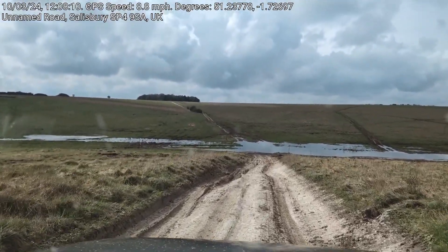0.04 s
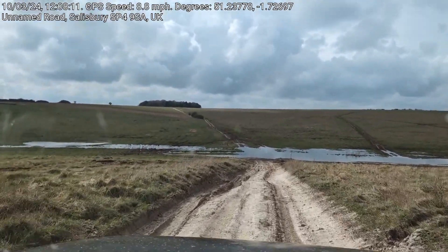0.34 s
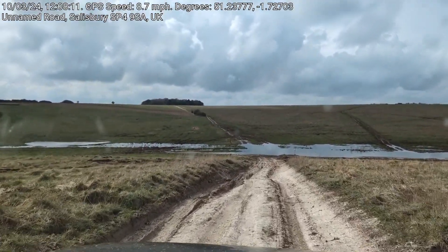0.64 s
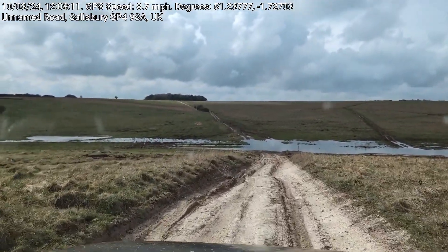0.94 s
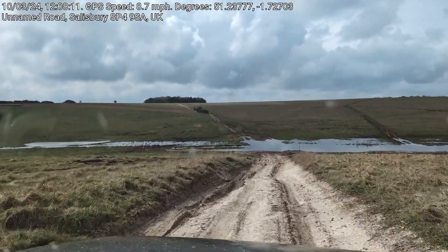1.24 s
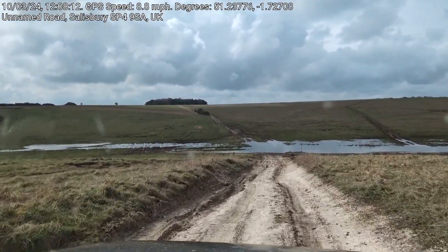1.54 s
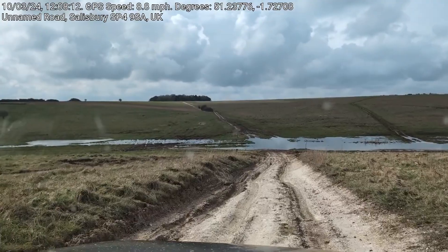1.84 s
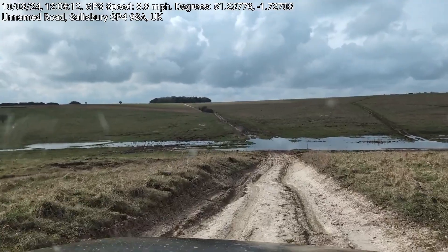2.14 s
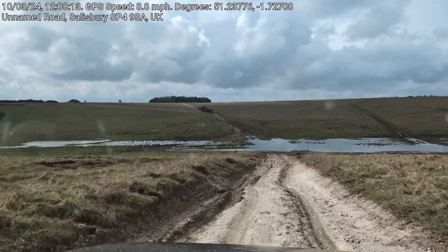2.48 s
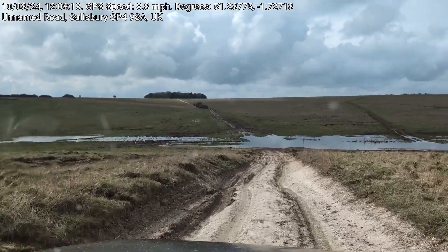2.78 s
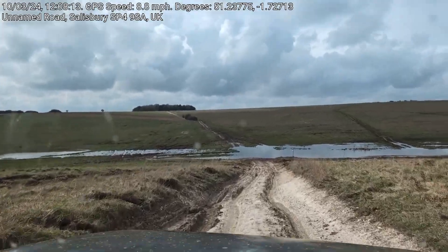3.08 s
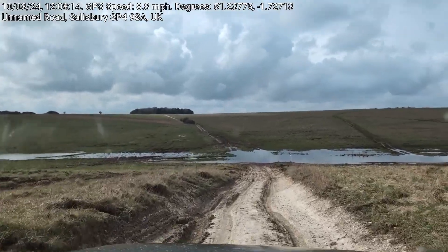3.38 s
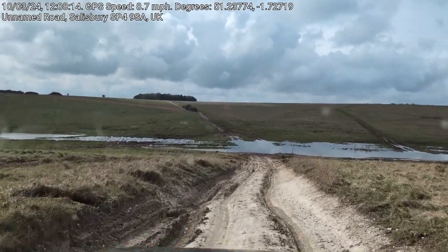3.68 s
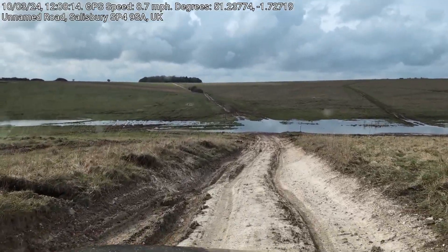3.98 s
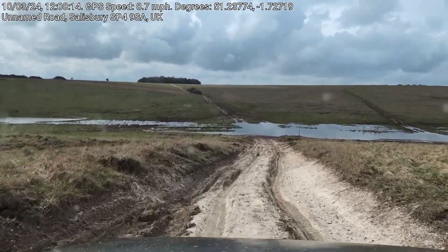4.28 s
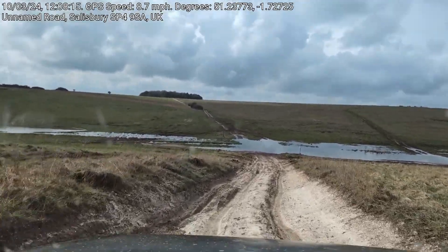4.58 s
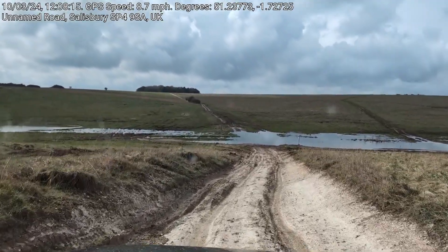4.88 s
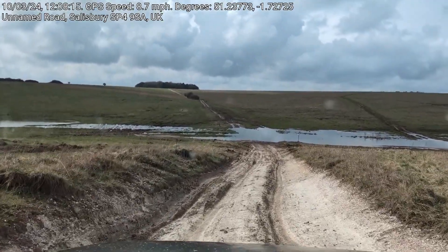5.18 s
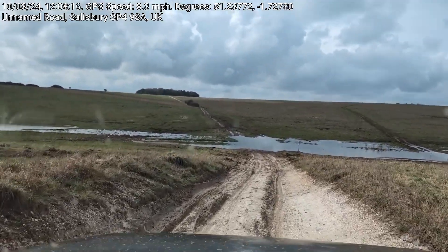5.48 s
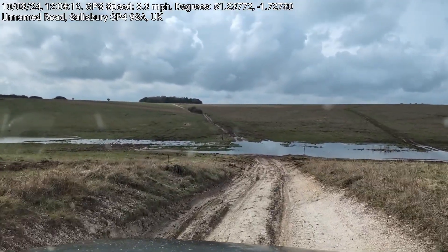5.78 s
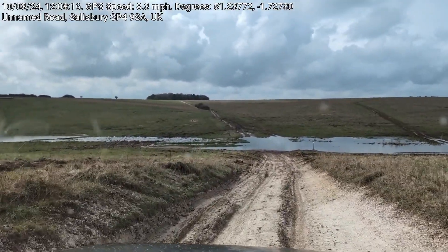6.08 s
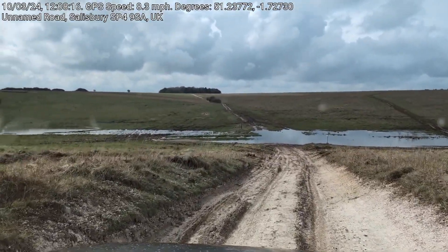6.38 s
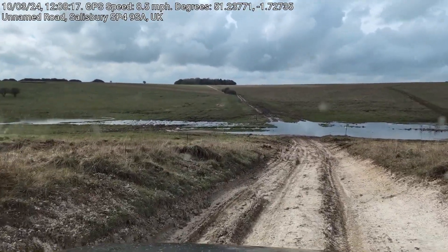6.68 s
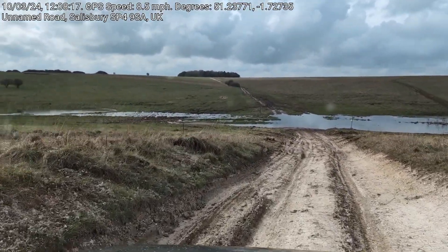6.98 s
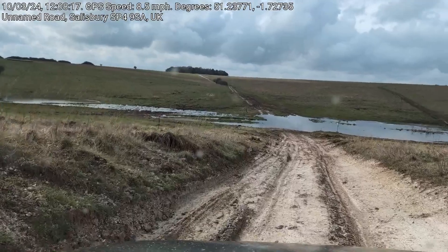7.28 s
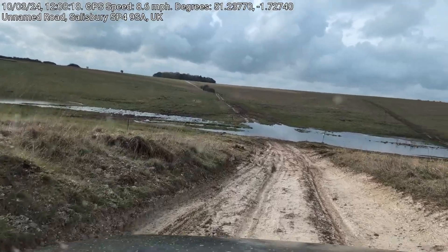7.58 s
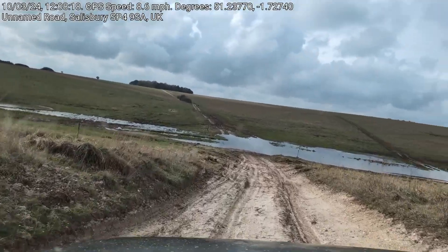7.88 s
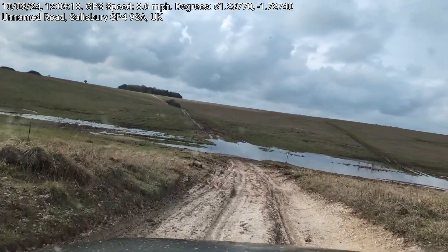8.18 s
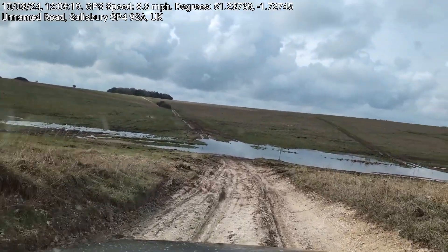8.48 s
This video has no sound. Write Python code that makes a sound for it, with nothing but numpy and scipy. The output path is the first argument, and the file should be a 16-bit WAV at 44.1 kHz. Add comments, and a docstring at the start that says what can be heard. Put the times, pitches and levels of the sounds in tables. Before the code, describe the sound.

A deep engine boom fills the cabin of an off-road car crawling along a rutted dirt track, with faint ticking and whirring over rumbling, crunching tyres. Midway, loose trim rattles and stones thud under the floor. A wheel thumps once, and the boom sinks as the engine slows and a faint belt whine rises. Near the end the boom returns with more rattles. Heard from inside, at the windscreen.

```python
"""A low engine boom fills the cabin of a four-cylinder off-road car crawling along a rutted chalk track.
The engine sits on the cabin's resonance, ticking and whirring over the rumble and crunch of the tyres;
when it slows, the boom sinks and the belt drive sings. Fittings chirp, stones thud on the floor pan and
loose trim rattles in the ruts. Mud sprays, keys clink, a sleeve brushes past and a wheel thumps once."""
import sys
import numpy as np
from scipy import signal
from scipy.fft import rfft, irfft
from scipy.io import wavfile
from scipy.ndimage import uniform_filter1d, minimum_filter1d

SR = 44100
rng = np.random.default_rng(int(sys.argv[2]) if len(sys.argv) > 2 else 0)


def file_out(sig):
    """Save sig as 16-bit WAV at sys.argv[1]."""
    # one column per channel
    cols = np.atleast_2d(sig).T
    # limit, then scale
    lim = np.clip(cols, -1, 1)
    pcm = np.round(lim * 32767).astype(np.int16)
    wavfile.write(sys.argv[1], SR, pcm)


N = 381002

# resonances of the hollow cabin: (centre [Hz], width [Hz], level [dB])
CABIN_MODES = [(145.4, 7, 1.5), (268.6, 28, -5.5), (350, 17, -12.5), (446, 43, -12.5), (538.6, 5.7, -13)]
# bright crack of hard plastic: (frequency [Hz], level [dB])
PLASTIC_SPECTRUM = [(900, -6), (2000, -7.5), (3000, -2), (4300, 1), (5500, -3), (7200, -3), (8800, -9.5),
                    (11000, -19), (15500, -18)]


def from_db(db):
    """Decibels to gain."""
    return 10 ** (np.asarray(db) / 20)


def rms_one(x):
    """Scale to unit power."""
    return x / np.sqrt(np.mean(x ** 2) + 1e-20)


def in_time(rows):
    """Draw a curve through each column of (time, values...) rows, at every sample."""
    times, *columns = np.transpose(rows)
    return [np.interp(np.arange(N) / SR, times, column) for column in columns]


def drift(rate_hz):
    """Smooth random wander with a spread of 1."""
    hop, warm_up = 40, 2000
    pole = np.exp(-2 * np.pi * rate_hz * hop / SR)
    noise = rng.standard_normal(N // hop + warm_up + 2)
    slow = signal.lfilter([1], [1, -2 * pole, pole * pole], noise)[warm_up:]
    return np.interp(np.arange(N) / hop, np.arange(len(slow)), rms_one(slow))


def phase_of(hz):
    """Phase of a gliding tone."""
    return 2 * np.pi * np.cumsum(hz) / SR


def colour(x, spectrum):
    """Minimum-phase EQ through (Hz, dB) points, with 24 dB/octave skirts; white noise keeps its power."""
    size = 16384
    hz, db = np.transpose(spectrum)
    octave = np.log2(np.maximum(np.arange(size // 2 + 1) * SR / size, 1))
    outside = np.abs(octave - np.clip(octave, np.log2(hz[0]), np.log2(hz[-1])))
    gain = rms_one(from_db(np.interp(octave, np.log2(hz), db) - 24 * np.minimum(outside, 3)))
    cepstrum = irfft(np.log(gain))
    folded = np.r_[cepstrum[0], 2 * cepstrum[1:size // 2]]
    return signal.fftconvolve(x, irfft(np.exp(rfft(folded, size))))[:N]


def ring(clicks, hz, t60):
    """One mode: a unit click sets a sine of height 1 ringing."""
    radius = from_db(-60 / (t60 * SR))
    angle = 2 * np.pi * min(hz, .45 * SR) / SR
    return signal.lfilter([0, np.sin(angle)], [1, -2 * radius * np.cos(angle), radius ** 2], clicks + 1e-18)


def add(track, s, sound):
    """Mix a short sound in at s seconds."""
    at = max(round(s * SR), 0)
    track[at:at + len(sound)] += sound[:N - at]


def burst(decay_s):
    """Noise that starts at once and dies away."""
    t = np.arange(SR // 4) / SR
    return rng.standard_normal(len(t)) * np.exp(-t / decay_s)


def grains(per_s, spread_db):
    """Random clicks of uneven size, at unit power."""
    sizes = from_db(spread_db * np.minimum(rng.exponential(1, N), 4)) * rng.choice([-1, 1], N)
    return rms_one(sizes * (rng.random(N) < per_s / SR))


def swells(rows, half_s):
    """Gain with a bell-shaped rise or dip at each (time, dB) row."""
    t = np.arange(N) / SR
    return from_db(sum(db * np.exp(-((t - s) / half_s) ** 2) for s, db in rows))


def lulls():
    """Gain of the boom and the body shake, which dip briefly together."""
    # dips in the low end: (time [s], level change [dB])
    dips = [(.665, -3.5), (2.71, -4), (3.58, -4), (3.865, -5), (4.41, -4), (4.85, -4), (5.02, -11),
            (5.32, -5), (5.85, -13), (6.6, -5), (6.99, -5), (8.48, -5)]
    return swells(dips, half_s=.024)


def boom(firing_hz, centre_hz=54.85, width_hz=6.37, boom_db=-13, floor_db=-31.5, flutter=.021):
    """The cabin booms as the firing rate meets its lowest resonance; away from it a weak drone remains."""
    # the engine load rises or drops as the car lurches: (time [s], level change [dB])
    lurches = [(2.76, -1.5), (5.24, 2.5), (5.7, 1), (6.17, -6.5), (6.5, -4.5), (6.74, 6), (8.52, 0)]
    detuning = np.abs(firing_hz - centre_hz) / (width_hz / 2)
    resonance = from_db(floor_db) + from_db(boom_db) / (1 + detuning ** 3.1)
    level = resonance * swells(lurches, half_s=.088) * lulls() * (1 + flutter * drift(10))
    return np.sqrt(2) * level * np.sin(phase_of(firing_hz))


def cabin_gain(hz):
    """How strongly the cabin's resonances answer a tone."""
    return sum(from_db(db) / np.hypot(1, (hz - centre) / (width / 2)) for centre, width, db in CABIN_MODES)


def hum_and_belt(firing_hz, throb=.3, belt_rough=.23, slip_rad=.28, hum_db=-42, fall_db_per_octave=17):
    """Overtones of the firing rate: a throbbing hum, and the whine of a slightly slipping belt drive."""
    # overtone levels: (time [s], second order [dB], belt whine [dB])
    overtones = [(0, -36.5, -61.5), (1.85, -34.5, -55.5), (2.85, -38.5, -62), (3.4, -42.5, -74.5),
                 (4.85, -40, -72.5), (5.2, -36, -53), (5.65, -45, -61), (5.95, -29.5, -50),
                 (6.17, -41, -49), (6.38, -32.5, -50.5), (6.55, -38.5, -48), (7.1, -44.5, -54.5),
                 (7.3, -43, -67.5), (8.64, -32.5, -62)]
    second_db, whine_db = in_time(overtones)
    phase = phase_of(firing_hz)
    tones = from_db(second_db) * (1 + throb * drift(5.5)) * np.sin(2 * phase)
    for order, db in ((11, 0), (10, -9)):  # the belt's whine and a weaker tone below it
        level = from_db(whine_db + db) * (1 + belt_rough * drift(15))
        tones += level * np.sin(order * phase + slip_rad * drift(7.7))
    for order in range(3, 10):  # these swell as they cross the cabin's resonances
        level = from_db(hum_db - fall_db_per_octave * np.log2(order / 3)) * cabin_gain(order * firing_hz)
        tones += level * (1 + .2 * drift(5.4)) * np.sin(order * phase)
    return np.sqrt(2) * tones


def clatter(firing_hz, level_db=-54, fade_per_firing=1.7, db_per_hz=.24):
    """Each firing gives the block a short, rough tick, louder at higher revs; the cylinders differ."""
    # tick of each cylinder: (level [dB])
    cylinders = [-3, -5.5, -6, -6]
    # modes of the engine block: (pitch [Hz], level [dB], t60 [s])
    block_modes = [(798, 2.5, 0.046), (953, -5, 0.094), (1068, 0, 0.047), (1250, -1, 0.05),
                   (1347, -1.5, 0.038), (1593, 2, 0.0085), (1960, 2, 0.013)]
    firings = np.cumsum(firing_hz) / SR
    strength = from_db(cylinders)[firings.astype(int) % len(cylinders)]
    ticks = strength * np.exp(-fade_per_firing * (firings % 1))
    block = sum(from_db(db) * ring(ticks * rng.standard_normal(N), hz, t60) for hz, db, t60 in block_modes)
    return from_db(level_db + db_per_hz * (firing_hz - np.median(firing_hz))) * rms_one(block)


def gears(firing_hz, rough=.65, slack_rad=.8):
    """Timing gears whirr on high orders of the firing rate; slack between the teeth roughens them."""
    # whirr of the gears: (time [s], level [dB])
    whirr = [(0, -57), (1.1, -57), (1.42, -51.5), (1.7, -59), (2.35, -59.5), (2.8, -66), (7.0, -66),
             (7.9, -58), (8.64, -62)]
    # gear tones: (pitch [multiples of the firing rate])
    orders = [18, 21, 28, 29]
    # balance of those tones: (level [dB])
    orders_db = [-8, -2, -1, 0]
    level_db, = in_time(whirr)
    phase = phase_of(firing_hz)
    tones = sum(from_db(db) * (1 + rough * drift(4.2)) * np.sin(order * phase + slack_rad * drift(45))
                for order, db in zip(orders, orders_db))
    return from_db(level_db) * rms_one(tones)


def tyres(shake_db=-27.5, rumble_db=-43, grit_db=-62, rumble_follows=.85, grit_follows=.35):
    """Lumps shake the body; rumble in the cabin and crunch and grit under the tread grow on rough ground."""
    # roughness of the track, heard as crunch: (time [s], level [dB])
    roughness = [(0.05, -48), (0.38, -48.5), (0.76, -48.5), (1.02, -49.5), (1.71, -50), (2.83, -53.5),
                 (3.19, -52), (3.8, -54), (4.1, -49), (4.3, -52), (4.49, -50.5), (4.68, -54.5), (4.97, -56),
                 (5.94, -53), (6.32, -53), (7.29, -50), (7.58, -50.5), (7.85, -47.5), (7.96, -49),
                 (8.58, -52)]
    # deep shake of the body: (frequency [Hz], level [dB])
    shake_spectrum = [(20, -23.5), (34, -26), (46, -8.5), (60, 2), (72, -6.5), (88, -18), (120, -21.5),
                      (160, -24), (220, -42.5)]
    # rolling rumble: (frequency [Hz], level [dB])
    rumble_spectrum = [(110, -17.5), (160, -3.5), (200, -2), (250, 3), (330, -1.5), (450, -5), (560, -11),
                       (700, -15.5), (1100, -32.5)]
    # stones crunching under the tread: (frequency [Hz], level [dB])
    crunch_spectrum = [(400, -7.5), (650, 0.5), (900, -4.5), (1250, -3.5), (1600, -2), (2000, -6),
                       (2400, -9), (3200, -15.5), (4500, -28)]
    # fine grit: (frequency [Hz], level [dB])
    grit_spectrum = [(2000, -5), (3000, 0.5), (4000, 0.5), (5000, -5), (6300, -6.5), (7700, -11.5),
                     (8500, -20.5), (11000, -27.5), (15500, -36.5)]
    ground_db, = in_time(roughness)
    lumpy_db = ground_db + .36 * drift(1.3)
    swing_db = lumpy_db - ground_db.mean()
    shake = from_db(shake_db) * lulls() * colour(rng.standard_normal(N), shake_spectrum)
    hollow = sum(from_db(db) * rms_one(ring(rng.standard_normal(N), hz, np.log(1000) / (np.pi * width)))
                 for hz, width, db in CABIN_MODES)
    rumble = colour(grains(per_s=3000, spread_db=4.5), rumble_spectrum) + rms_one(hollow)
    rumble *= from_db(rumble_db + rumble_follows * swing_db)
    crunch_level = from_db(lumpy_db - .5 + 1.17 * drift(28))  # fast drift makes it patchy
    crunch = crunch_level * colour(grains(per_s=6000, spread_db=1.5), crunch_spectrum)
    grit_level = from_db(grit_db + grit_follows * swing_db + drift(43))
    grit = grit_level * colour(grains(per_s=14000, spread_db=2.5), grit_spectrum)
    return shake + rumble + crunch + grit


def fittings(tone_db=-4.5, click_db=-14, upper_db=-11, rise_s=.002, sag_per_s=5, rough=.05):
    """Small fittings chirp as they rub: each slip is a tiny sagging two-partial tone with a faint click."""
    # slips: (time [s], level [dB], pitch [Hz])
    slips = [(.063, -46, 5950), (.720, -53, 6000), (.739, -52, 5200), (.779, -49, 5200), (.781, -48, 3900),
             (.904, -54, 5150), (2.160, -53, 7000), (2.388, -52, 5600), (3.259, -50, 6000),
             (3.275, -48.5, 6000), (3.312, -48, 6000), (3.330, -47, 5950), (3.949, -50, 7900),
             (4.662, -53, 7300), (5.152, -55, 5500), (6.425, -56, 6700), (6.475, -54, 6900),
             (6.531, -52, 6750), (6.581, -52, 6750), (7.149, -49, 5250), (8.304, -50, 6270)]
    chirps, clicks = np.zeros((2, N))
    t = np.arange(SR // 25) / SR
    envelope = t / rise_s * np.exp(1 - t / rise_s)
    for s, db, hz in slips:
        waver = rms_one(uniform_filter1d(rng.standard_normal(len(t)), size=24))
        phase = phase_of(hz * (1 - sag_per_s * (t - rise_s) + rough * waver))
        tone = np.sin(phase) + from_db(upper_db) * np.sin(1.22 * phase)
        add(chirps, s, from_db(db + tone_db) * envelope * tone)
        add(clicks, s, from_db(db + click_db) * burst(2 * rise_s))
    return chirps + colour(clicks, PLASTIC_SPECTRUM)


def stones(blow_db=-4, rise_s=.003, t60_s=.075):
    """Stones thrown up by the tyres thud on the damped floor pan; each spot rings at its own pitch."""
    # stone hits: (time [s], level [dB], pitch of the struck spot [Hz])
    hits = [(.955, -44, 760), (1.259, -41, 600), (4.325, -33.5, 800), (4.509, -38, 730), (4.601, -38, 760),
            (4.686, -43, 800), (4.951, -41, 780), (5.213, -44, 780), (5.707, -42, 780), (5.806, -43, 800),
            (5.975, -42, 780), (7.460, -35.5, 710), (7.648, -33, 590), (7.801, -37, 1100),
            (7.809, -36, 640), (7.868, -36.5, 570)]
    # dull blow on the floor pan: (frequency [Hz], level [dB])
    pan_spectrum = [(350, -5), (600, 1.5), (780, 1), (1100, -4.5), (1600, -23.5), (2600, -24.5)]
    blows, rings = np.zeros((2, N))
    t = np.arange(SR // 4) / SR
    envelope = (1 - np.exp(-t / rise_s)) * from_db(-60 * t / t60_s)
    for s, db, hz in hits:
        add(blows, s, from_db(db + blow_db) * burst(decay_s=.012))
        add(rings, s, from_db(db) * envelope * np.sin(2 * np.pi * hz * t))
    return colour(blows, pan_spectrum) + rings


def trim_contacts(rebound_s=.014, least_loss_db=11, rebound_top_db=-42, jogs_per_s=2, jog_spread_db=3):
    """Deep ruts knock the trim, which falls back once, more weakly; lesser bumps jog it at random."""
    # knocks: (time [s], level [dB], crack level [dB], chatter decay [s], ring offset [dB])
    knocks = [(1.104, -35, -62, .007, 0), (3.7155, -25, -35.5, .007, 8), (3.728, -32, -45, .007, 5),
              (3.8635, -33.5, -52.5, .0045, -6), (3.938, -39.5, -54, .011, -5),
              (4.010, -35, -38.5, .0065, -6), (4.075, -38.5, -52, .009, -4), (4.096, -38, -50, .006, -5),
              (4.119, -42, -52, .006, -7), (4.326, -37, -55, .005, -5), (4.333, -43, -52, .009, -7),
              (4.408, -35, -56, .01, -5), (4.442, -47, -49, .014, -8), (4.461, -36.5, -50, .014, -5),
              (4.494, -31.5, -50, .008, 2), (4.509, -31, -50, .008, 2), (4.555, -34, -47, .007, -9),
              (4.602, -38, -56, .014, -6), (4.621, -37.5, -57, .009, -5), (4.687, -40, -61, .006, -5),
              (5.213, -40.5, -59, .018, -2), (5.335, -36.5, -57, .026, 1), (7.459, -29.5, -40, .006, 4.5),
              (7.475, -34, -56, .005, 1), (7.644, -33, -56, .007, -2), (7.652, -36, -54, .005, -5),
              (7.810, -36, -62, .007, 0), (7.878, -38, -64, .012, 0), (8.304, -48, -52, .005, -8)]
    rebounds = []
    for s, db, bright_db, chatter_s, ring_db in knocks:
        loss_db = max(least_loss_db, db - rebound_top_db)
        delay_s = rebound_s * rng.uniform(.5, 1.5)
        rebounds.append((s + delay_s, db - loss_db, bright_db - loss_db, chatter_s, ring_db))
    gaps, sizes = rng.uniform(-1, 1, (60, 2)).T
    jog_times = np.cumsum(1 + gaps) / jogs_per_s
    jogs = [(s, -47 + db, -69.5 + db, .0074, -2)
            for s, db in zip(jog_times, jog_spread_db * sizes) if s < N / SR]
    return knocks + rebounds + jogs


def trim(modes_db=-13, body_db=-6, crack_db=-1, chatter=.07, uneven_db=.5, settle_db=-18, settle_s=.06):
    """Loose trim hits and chatters: a ringing panel, a dry body, a crack and a faint settling hiss."""
    # modes of the panel: (pitch [Hz], level [dB], t60 [s])
    panel_modes = [(445, -7, .09), (610, -16, .05), (735, -1.5, .08), (1090, -8, .04), (1215, 2.5, .068),
                   (1350, -6, .035), (1473, 2.5, .056), (1664, 2, .056), (1964, 0, .052), (2160, -8, .03),
                   (2520, -7, .02), (3140, -12, .04), (3900, -14, .03)]
    # dry body of a knock: (frequency [Hz], level [dB])
    body_spectrum = [(550, -6), (900, -3), (1400, 0), (1900, -.5), (2600, -8), (3600, -16)]
    panel, bodies, cracks = np.zeros((3, N))
    for s, db, bright_db, chatter_s, ring_db in trim_contacts():
        for hz, mode_db, t60 in panel_modes:
            blow = chatter * burst(chatter_s)
            blow[0] += rng.choice([-1, 1])
            tone = ring(blow, hz, t60)
            # the mode gets the energy of one clean hit, however the chatter spreads it
            tone *= np.sqrt(t60 * SR / (4 * np.log(1000))) / np.linalg.norm(tone)
            tone_db = db + modes_db + ring_db + mode_db - uneven_db * rng.standard_normal()
            add(panel, s, from_db(tone_db) * tone)
        add(bodies, s, from_db(db + body_db) * burst(chatter_s))
        crack = from_db(bright_db + crack_db) * (burst(chatter_s) + from_db(settle_db) * burst(settle_s))
        top_hz = np.clip(15000 + 500 * (bright_db + 39), 3000, 15000)  # duller below -39 dB
        add(cracks, s, signal.sosfilt(signal.butter(3, top_hz, fs=SR, output="sos"), crack))
    return panel + colour(bodies, body_spectrum) + colour(cracks, PLASTIC_SPECTRUM)


def mud(decay_s=.12):
    """Wet mud flung from a rut spatters the wheel arch with a fine hiss that dies away."""
    # sprays: (time [s], level [dB])
    sprays = [(3.95, -70.5), (4.012, -69.5), (4.442, -64), (4.555, -82)]
    # fine spatter: (frequency [Hz], level [dB])
    spatter_spectrum = [(5000, -3), (8000, -3), (9400, 1), (10500, -10), (15500, -15)]
    t = np.arange(N) / SR
    flow = sum(from_db(db) * (t >= s) * np.exp(-np.abs(t - s) / decay_s) for s, db in sprays)
    return flow * colour(grains(per_s=2500, spread_db=-.5), spatter_spectrum)


def keys(ring_db=-13, jangle_db=-1):
    """Hanging keys touch with a bright jangle and ring briefly."""
    # clinks: (time [s], level [dB])
    clinks = [(4.916, -49.5), (6.072, -47)]
    # ringing modes of the keys: (pitch [Hz], level [dB], t60 [s])
    key_modes = [(7800, -3, .05), (7880, -5, .06), (9500, 3, .07), (9520, -2, 0.065), (10420, -4, 0.098),
                 (10600, -3, 0.076), (11480, -4, 0.046), (11900, -4, .05)]
    # bright click of their many short modes: (frequency [Hz], level [dB])
    jangle_spectrum = [(5000, -11), (7000, -16), (7800, 1), (8600, -11), (10500, -3), (12000, -7),
                       (12800, -16), (15500, -21)]
    touches, jangle = np.zeros((2, N))
    for s, db in clinks:
        add(touches, s, from_db([db + ring_db]))
        add(jangle, s, from_db(db + jangle_db) * burst(decay_s=.012))
    ringing = sum(from_db(db) * ring(touches, hz, t60) for hz, db, t60 in key_modes)
    return ringing + colour(jangle, jangle_spectrum)


def sleeve(weave_db=-9, blur=.6):
    """Cloth hisses as it slides; its weave adds a rough pitch that follows the speed."""
    # one brush of the sleeve: (time [s], level [dB], weave pitch [Hz])
    brush = [(5.1, -110, 2940), (5.42, -74, 3000), (5.53, -63.5, 3210), (5.575, -52, 3930),
             (5.61, -50.5, 4800), (5.655, -52, 3880), (5.70, -60, 3480), (5.87, -110, 2960)]
    # hiss of the cloth: (frequency [Hz], level [dB])
    cloth_spectrum = [(2000, -15.5), (3200, 1), (4200, 5.5), (5600, -1.5), (7500, 2), (9000, -5),
                      (11500, -10), (14500, -9), (16000, -17)]
    level_db, weave_hz = in_time(brush)
    weave = np.sin(phase_of(weave_hz * (1 + blur * drift(300))))
    hiss = colour(rng.standard_normal(N), cloth_spectrum)
    return from_db(level_db) * (hiss + from_db(weave_db) * weave)


def wheel_thump(at_s=5.361, level_db=-7.5, low_cut_hz=48):
    """A wheel drops into a rut: the suspension takes one soft blow, falling in pitch."""
    # shape of the blow: (first pitch [Hz], last pitch [Hz], half length [s])
    blow_shape = (115, 55, .012)
    first_hz, last_hz, half_s = blow_shape
    t = np.arange(N) / SR - at_s
    phase = phase_of(np.interp(t, [-2 * half_s, 2 * half_s], [first_hz, last_hz]))
    blow = from_db(level_db) * np.exp(-(t / half_s) ** 2) * np.cos(phase - phase[round(at_s * SR)])
    return signal.sosfilt(signal.butter(6, low_cut_hz, "high", fs=SR, output="sos"), blow)


def cabin_echo(x, echo_db=-9):
    """Close glass and panels add a short, dense echo, 2.5 ms behind the sound."""
    echo = np.r_[np.zeros(SR // 400), burst(decay_s=.0027)]
    return x + from_db(echo_db) * signal.fftconvolve(x, echo / np.linalg.norm(echo))[:N]


def scene(surge_hz=.12):
    """Everything as heard at the windscreen, in mono."""
    # engine speed: (time [s], firing rate [Hz])
    revs = [(0, 54), (.45, 55.3), (.7, 52.7), (1.15, 53.2), (1.42, 55.2), (1.75, 53.3), (2.2, 54.2),
            (2.7, 53.7), (3.24, 55.3), (3.42, 52.6), (4.04, 50.4), (4.09, 53.1), (4.33, 54), (4.54, 52.1),
            (4.77, 51.7), (4.88, 48.2), (5.04, 47.5), (5.25, 49.3), (5.42, 50), (5.55, 48.8), (5.7, 50),
            (5.88, 47.7), (6.0, 47.5), (6.17, 48.7), (6.45, 47.9), (6.7, 49.9), (6.93, 49.4), (7.09, 51.4),
            (7.17, 53), (7.88, 54.6), (8.64, 52.1)]
    firing_hz, = in_time(revs)
    firing_hz += surge_hz * drift(2)  # bumps make the revs waver
    engine = boom(firing_hz) + hum_and_belt(firing_hz) + clatter(firing_hz) + gears(firing_hz)
    direct = engine + tyres() + wheel_thump() + sleeve() + mud()
    rattles = trim() + stones() + fittings() + keys()
    return (direct + cabin_echo(rattles))[None]


def record(dry, ceiling=.45, cutoff_hz=15700):
    """A gentle limiter steadies the loudest booming; the top is cut steeply."""
    window = SR // 25
    needed = np.minimum(1, ceiling / (np.abs(dry) + 1e-9))
    gain = uniform_filter1d(minimum_filter1d(needed, size=window), size=window)
    return signal.sosfilt(signal.ellip(10, .1, 80, cutoff_hz, fs=SR, output="sos"), gain * dry)


dry = scene()
out = record(dry)
file_out(out)
```